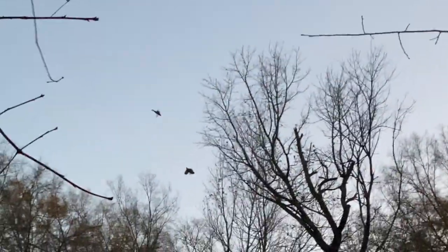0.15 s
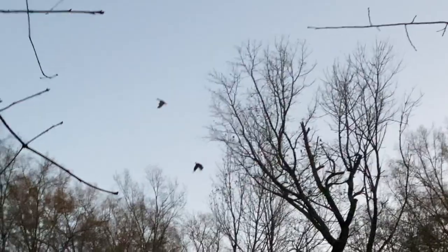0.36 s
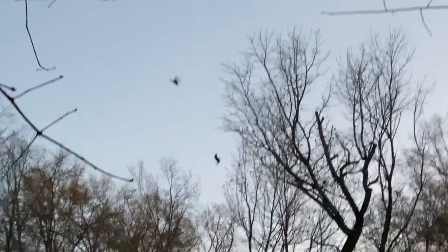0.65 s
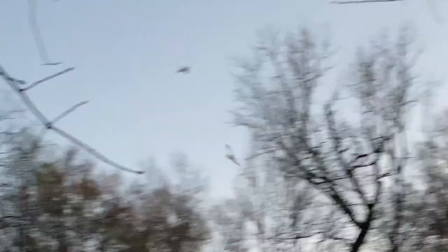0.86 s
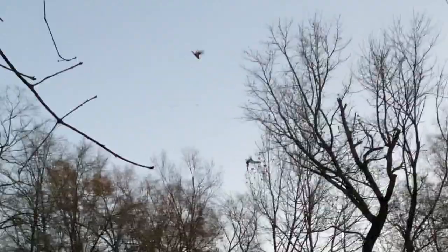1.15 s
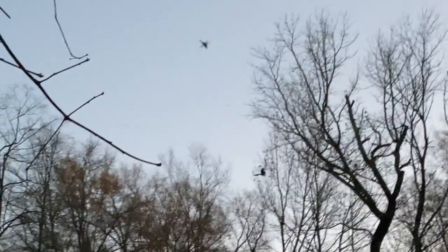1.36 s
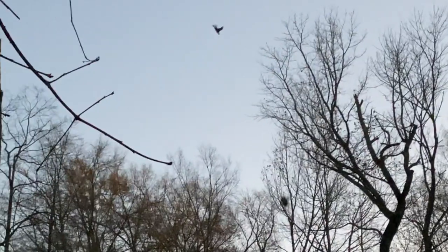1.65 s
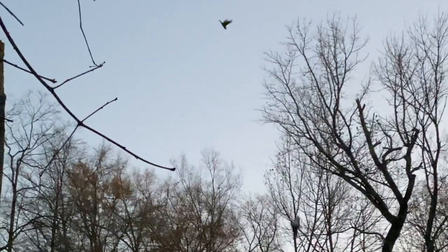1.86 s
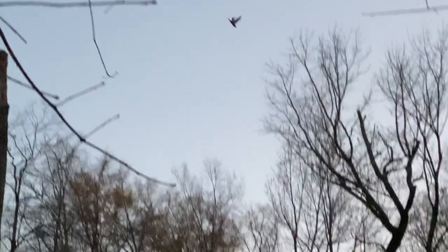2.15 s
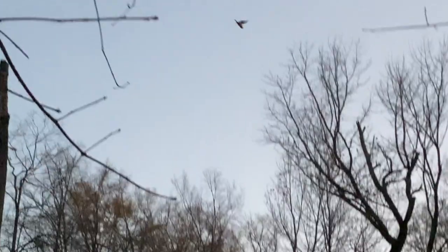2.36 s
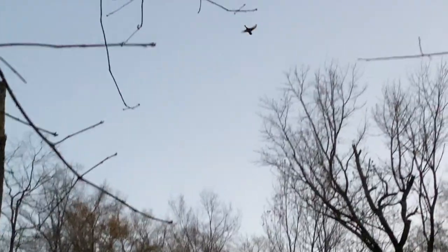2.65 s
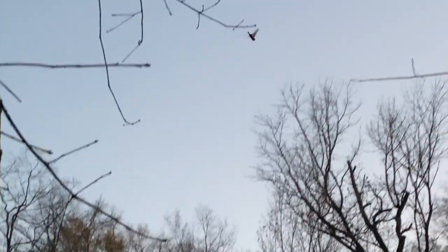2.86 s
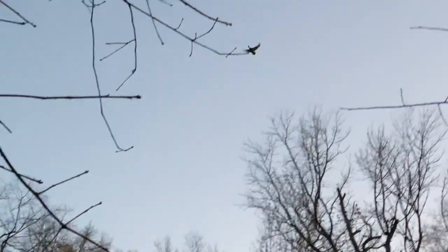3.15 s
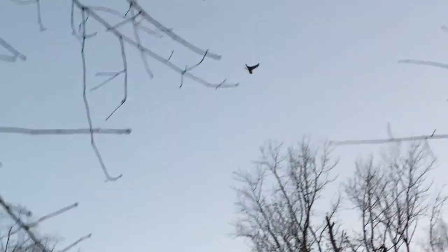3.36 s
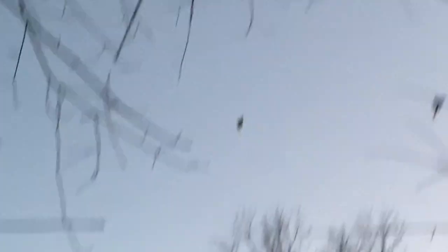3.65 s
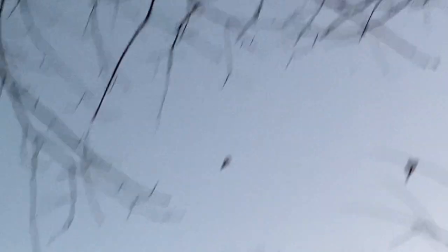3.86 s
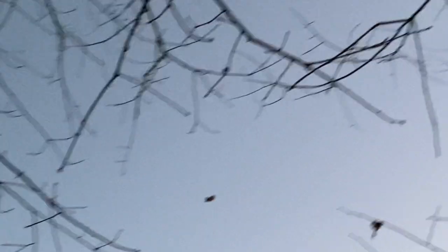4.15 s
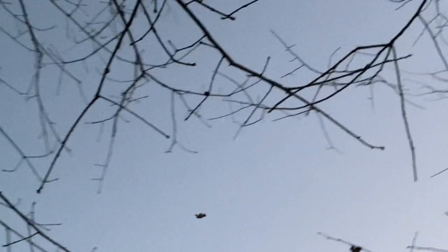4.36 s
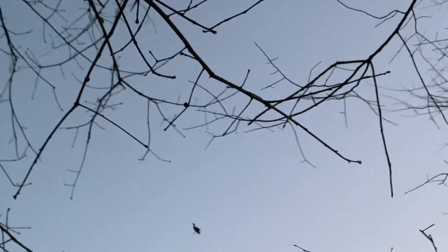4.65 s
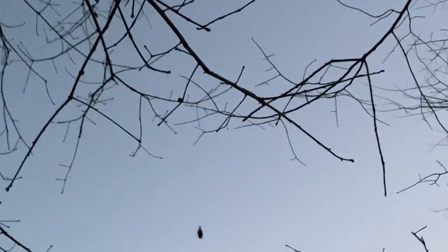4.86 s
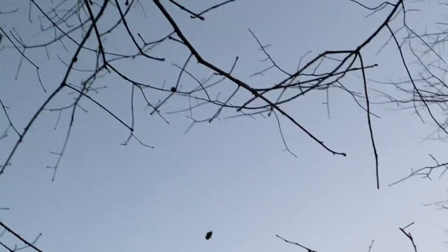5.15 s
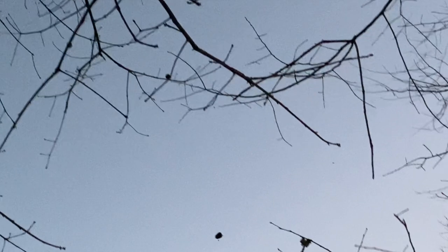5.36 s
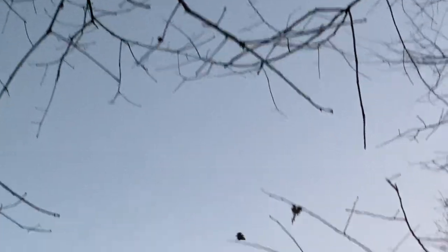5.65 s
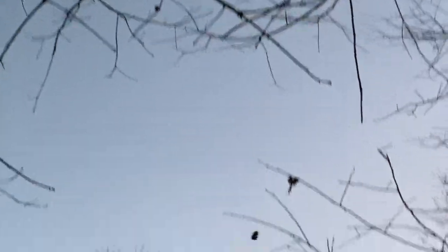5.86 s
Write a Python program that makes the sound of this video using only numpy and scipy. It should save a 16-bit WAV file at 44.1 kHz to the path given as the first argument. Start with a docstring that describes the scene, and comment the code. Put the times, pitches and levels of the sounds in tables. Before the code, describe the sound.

At about 0.1 seconds a shotgun fires in a flooded wood, with a ringing crack and a low boom. Echoes slap back near 0.3 and 0.7 seconds, then a swell from the far tree line rolls away, growing duller as it fades into faint air noise. At 2.9 seconds a weaker, more distant shot sounds, followed at 3.1 by a loud, deeper one, with thudding echoes until about 3.7. A soft low rumble rises around 4 seconds. Two more sharp blasts land at 4.6 and 4.85 seconds, the last the fullest, with a bright slap just behind it. Their echoes clatter off near trunks and roll through the wood, still fading at 6 seconds, over a few faint low throbs. The sound is wide stereo, as from a phone microphone that overloads slightly and ducks on the loudest peaks.

```python
"""A flooded wood, where guns at different distances fire five shotgun blasts at birds.
Each is a crack, a ringing shock and a low boom that sweeps down as the microphone's filtering delays
the lows. Scattering adds a clatter off near trunks and a swell from the far tree line, which rolls away
as the air absorbs its treble; a bank and stands of trees return echoes. Air noise and a rumble lie
beneath. A phone's processing widens the stereo, and its two microphone ports overload on the peaks."""
import sys
import numpy as np
from scipy import signal
from scipy.fft import rfft, irfft, next_fast_len
from scipy.io import wavfile

SR = 44100
rng = np.random.default_rng(int(sys.argv[2]) if len(sys.argv) > 2 else 0)


def output_pcm(signal):
    """Save a mono or channel-first signal as 16-bit PCM at the path in sys.argv[1].

    Samples are clipped to [-1, 1] before scaling.
    """
    pcm = np.clip(np.atleast_2d(signal).T, -1, 1) * 32767
    wavfile.write(sys.argv[1], SR, np.round(pcm).astype(np.int16))


N = 264908
STEP, CUTOFF_HZ = 16, 8900      # samples per envelope point; upper band edge
TIME = np.arange(N) / SR
SLOW_TIME = TIME[::STEP]
SIZE = next_fast_len(N + 4096, real=True)
FREQ = np.maximum(np.arange(SIZE // 2 + 1) * SR / SIZE, 1)

# The guns. Each row: start in seconds, shock level in dB, bark pitch in Hz, crack level in dB, crack
# tilt in dB per octave, boom level in dB, then boom length, crack decay and rebound delay in seconds.
SHOTS = [(0.0917, -2.5, 1220, -21, 2.5, -2.5, 0.027, 0.0095, 0.029),
         (2.917, -16.5, 814, -16.5, 0.5, -7.5, .019, 0.011, 0.016),
         (3.1242, 2, 636, -11, -3.5, -4, .031, 0.0072, .0165),
         (4.6079, -2.5, 1233, -7, 3, -1, 0.019, 0.0057, 0.011),
         (4.854, 0.5, 1452, -3.5, 1.5, 2.5, 0.036, 0.019, 0.018)]
# The wood's answer to each shot. Each row: near-trunk level in dB, its decay in seconds, deep-wood
# level in dB, tree-line level in dB, its delay in seconds, bank level in dB, gain of the stands in dB,
# their highest cutoff in Hz.
ANSWERS = [(-13, 0.06, -31, -17.5, 0.94, -15.5, 0.5, 12000),
           (-27, 0.028, -24.5, -21, 0.91, -35.5, -7, 1000), (-14, .086, -30.5, -32, 0.38, -15.5, -5.5, 800),
           (-15, 0.036, -22, -24, 0.67, -25, -10.5, 1200),
           (-11.5, 0.091, -20.5, -26, .64, -10.5, -9.5, 500)]
# Stands of trees that answer every shot. Each row: delay in seconds, level in dB, cutoff in Hz.
STANDS = [(0.224, -23.5, 498), (0.378, -24.5, 600), (0.465, -26, 515), (0.575, -33, 9900),
          (.644, -28.5, 1890)]
# Prominent slap echoes. Each row: start in seconds, thud level in dB, bark level in dB, bark pitch
# in Hz, noise level in dB.
SLAPS = [(0.2884, -17.5, -7, 420, -26), (.668, -15.5, -25.5, 500, -34), (3.032, -10.5, -28, 390, -32),
         (3.181, -19.5, -26, 704, -15.5), (3.33, -16.5, -18, 351, -23), (3.595, -25.5, -19.5, 956, -21.5),
         (3.641, -16.5, -31, 495, -41), (4.983, -24.5, -25, 1100, -9.5)]
# Spectra of crack, near trunks, far wood and quiet air. Each row: frequency in Hz, density in dB.
CRACK_SPECTRUM = [(30, -14.5), (120, -10), (300, 5), (650, 2.5), (950, -7), (1250, -6.5), (1900, -14.5),
                  (3300, -16.5), (5000, -23.5), (8500, -32)]
NEAR_SPECTRUM = [(30, -7), (120, 3.5), (300, -5), (650, -1.5), (1250, -7.5), (1900, -15.5), (3300, -17.5),
                 (5000, -21), (8500, -25)]
FAR_SPECTRUM = [(25, -21.5), (50, -7.5), (90, 3.5), (140, 3), (230, -4), (400, -4), (750, -5.5),
                (1250, -11), (1900, -14.5), (3500, -22.5), (5000, -27.5), (8500, -31.5)]
AIR_SPECTRUM = [(15, -39), (25, -12.5), (80, -6.5), (124, 2), (286, -10.5), (425, -8.5), (1220, -26.5),
                (2050, -45.5), (5500, -53.5), (9000, -73.5), (11700, -94), (19800, -120)]
# Absorption in the wood. Each row: frequency in Hz, loss in dB per second.
ABSORPTION = [(40, 6), (130, 7.5), (420, 12), (1100, 15), (2500, 27), (5000, 42), (9000, 65)]
# The rumble's envelope. Each row: time in seconds, level in dB.
RUMBLE_LEVELS = [(0, -62), (.8, -48.5), (2.0, -62), (3.3, -54), (4.05, -38), (4.35, -49), (4.8, -41.5),
                 (6, -48)]
# Resonances of the shock; peaks and dips of the housing. Each row: centre and width in Hz, gain in dB.
SHOCK_MODES = [(760, 92, 3), (1247, 290, 0), (2500, 190, -7.5), (3250, 500, -7.5), (4230, 170, -13.5)]
HOUSING_MODES = [(386, 110, 2), (583, 170, 2), (826, 120, 1.5), (960, 240, -1.5), (1145, 100, 1.5),
                 (1635, 200, 2), (2580, 1200, -0.5), (3266, 520, 5), (4130, 1400, 3), (5240, 990, -3.5),
                 (8050, 1500, -4)]
# Left-right likeness of scattered sound. Each row: frequency in Hz, coherence from 0 to 1.
COHERENCE = [(60, 1), (170, 0.55), (340, 0.17), (500, 0.14), (780, 0.76), (1200, 0.57), (1700, 0.03),
             (2200, 0.6), (3400, 0), (4300, 0.5), (5200, 1)]
# Balance of the channels. Each row: frequency in Hz, left minus right in dB.
CHANNEL_BALANCE = [(100, -0.1), (250, -0.5), (420, -2.5), (600, 2), (850, -3), (1300, -1), (1900, 5.5),
                   (2600, 6), (3300, -1.5), (4100, -5), (4900, 0.5), (9000, 0.5)]


def from_db(db):
    """Amplitude grows tenfold for every 20 dB."""
    return 10 ** (np.asarray(db) / 20)


def at_hz(points, hz):
    """Interpolation on a logarithmic frequency axis."""
    freqs, values = np.transpose(points)
    return np.interp(np.log(hz), np.log(freqs), values)


def density(spectrum, hz):
    """Spectral density as a gain at hz, normalised to unit power in the passband."""
    grid = FREQ[::STEP]
    power = np.mean(from_db(at_hz(spectrum, grid)) ** 2 * (grid < CUTOFF_HZ))
    return from_db(at_hz(spectrum, hz)) / np.sqrt(power)


def drift(rate_hz):
    """Low-passed noise gives a random fluctuation of unit variance."""
    pole = np.exp(-2 * np.pi * rate_hz * STEP / SR)
    noise = rng.standard_normal(2 * len(SLOW_TIME))
    slow = signal.lfilter([1], [1, -2 * pole, pole * pole], noise)[len(SLOW_TIME):]
    return slow / slow.std()


def burst(start, rise_s, fade_s):
    """An envelope of exponential build-up and decay."""
    age = np.maximum(SLOW_TIME - start, 0)
    return (1 - np.exp(-age / rise_s)) * np.exp(-age / fade_s)


def stereo_widening(from_hz, cycles, mid_lag_s=.0008, treble_lag_s=-.000374):
    """Phase shift: the phone's processing makes the right channel's middle range late, treble early."""
    split_hz = cycles / (mid_lag_s - treble_lag_s)      # the two lags join whole cycles apart
    lag_s = np.where(FREQ < split_hz, mid_lag_s * (FREQ > from_hz), treble_lag_s)
    return np.exp(-2j * np.pi * FREQ * lag_s)


def air_power(hz, level_db=-47):
    """Stationary noise: the quiet wood holds a constant power in each band."""
    return (from_db(level_db) * density(AIR_SPECTRUM, hz)) ** 2


def rumble(band_hz=(22, 55), apart=0.38, throb_start_s=5.05, every_s=.32, width_s=.055):
    """Amplitude modulation: very low noise swells slowly, then throbs three times, ever weaker."""
    bandpass = signal.butter(2, band_hz, "band", fs=SR, output="sos")
    mid, side = signal.sosfilt(bandpass, rng.standard_normal((2, N)))
    swell = from_db(np.interp(TIME, *np.transpose(RUMBLE_LEVELS)))
    throbs = sum(from_db(-25.5 - 5.5 * k) * np.exp(-((TIME - throb_start_s - k * every_s) / width_s) ** 2)
                 for k in range(3))
    return (swell + throbs) * (mid + apart * side * [[1], [-1]]) / mid.std()


def far_wood_power(hz, lag_s):
    """Reverberation from deep wood and tree line: absorption grows with path length and frequency."""
    loss_db_per_s = at_hz(ABSORPTION, hz)
    power = 0
    for (start, *_), (_, _, wood_db, line_db, delay_s, *_) in zip(SHOTS, ANSWERS):
        age = np.maximum(SLOW_TIME - start, 0)
        # the tree line swells as more of it is reached, then thins with distance
        reach = (age / delay_s) ** 1.77
        swell = reach / np.sqrt(1 + reach ** 2) / np.maximum(age / delay_s, 1) ** 0.71
        line = from_db(line_db - loss_db_per_s * np.maximum(age - .25, 0)) * swell
        wood = from_db(wood_db - loss_db_per_s * age) * burst(start + lag_s, rise_s=0.038, fade_s=0.9)
        power += line ** 2 + wood ** 2
    return density(FAR_SPECTRUM, hz) ** 2 * power


def echo_power(hz, bank_delay_s=.049, smear=0.29):
    """Reflection gives slaps and echoes off bank and stands; a farther stand smears its echo more."""
    # Each row: start in seconds, level in dB, decay in seconds, cutoff in Hz.
    echoes = [(start, db, 0.018, 1910) for start, *_, db in SLAPS]
    for (start, *_), (*_, bank_db, stands_db, top_hz) in zip(SHOTS, ANSWERS):
        echoes.append((start + bank_delay_s, bank_db, 0.02, 5060))
        echoes += [(start + delay_s, stands_db + db, smear * delay_s, min(dull_hz, top_hz))
                   for delay_s, db, dull_hz in STANDS]
    near = density(NEAR_SPECTRUM, hz)
    return sum((near * from_db(db) * burst(start, 0.00045, fade_s)) ** 2 / (1 + (hz / dull_hz) ** 4)
               for start, db, fade_s, dull_hz in echoes)


def clatter_power(hz, lag_s, rise_s=0.011):
    """Early scattering: the near trunks return each shot as a short clatter."""
    near = density(NEAR_SPECTRUM, hz)
    return sum((near * from_db(db) * burst(start + lag_s, rise_s, fade_s)) ** 2
               for (start, *_), (db, fade_s, *_) in zip(SHOTS, ANSWERS))


def crack_power(hz, lag_s, rise_s=.002):
    """A brief transient is broadband: each crack is a noise burst with its own spectral tilt."""
    crack = density(CRACK_SPECTRUM, hz)
    octaves = np.log2(hz / 1000)
    return sum((crack * from_db(db + tilt * octaves) * burst(start + lag_s, rise_s, fade_s)) ** 2
               for start, _, _, db, tilt, _, _, fade_s, _ in SHOTS)


def diffuse_field(grain_db=0.57, patchy_db=0.9, roll_db=1.0):
    """Incoherent sounds add in power; single trunks make the noise grainy, clumps make it roll."""
    left, other = rfft(rng.standard_normal((2, SIZE)))
    alike = np.clip(at_hz(COHERENCE, FREQ), 0, 1)
    right = alike * left * stereo_widening(from_hz=290, cycles=2) + np.sqrt(1 - alike ** 2) * other
    shared_db = grain_db * drift(280) + roll_db * drift(13)
    field = 0
    for hz in 25 * 2 ** (np.arange(19) / 2):      # half-octave bands
        window = np.cos(np.pi / 2 * np.minimum(2 * np.abs(np.log2(FREQ / hz)), 1))
        band = irfft([left * window, right * window], SIZE)[:, :N]
        lag_s = 0.71 / hz      # low bands start later
        power = far_wood_power(hz, lag_s) + echo_power(hz)
        power += clatter_power(hz, lag_s) + crack_power(hz, lag_s)
        grainy = hz / (hz + 300)      # long waves pass the trunks by
        flicker = from_db(grainy * shared_db + patchy_db * drift(12))
        field += band * np.interp(TIME, SLOW_TIME, np.sqrt(power * flicker ** 2 + air_power(hz)))
    return field


def boom(start, length_s, cycles, crest_s, rise_s):
    """Group delay: the microphone's high-pass filtering delays the lows, so the boom sweeps down."""
    age = np.clip(TIME - start, 1e-6, 1)
    envelope = (1 - np.exp(-age / rise_s)) * np.exp(-(age / length_s) ** 2)
    return envelope * np.cos(2 * np.pi * cycles * np.log(age / crest_s))


def shock(start, bark_hz, modes=(), bark_width_hz=85, rise_s=0.0028):
    """Damped resonance: the shock front, softened by twigs, rings with the gun's bark and any modes."""
    age = np.arange(SR // 10) / SR
    ring = sum(from_db(db) * np.exp(-np.pi * width * age) * np.sin(2 * np.pi * hz * age)
               for hz, width, db in [*modes, (bark_hz, bark_width_hz, 0)])
    return np.pad(ring * (1 - np.exp(-age / rise_s)), (int(start * SR), N))[:N]


def trunk_thuds(count=4, from_s=.39, until_s=.74, spread_db=5.5):
    """Backscatter from big trunks at random delays, in rows like the first four columns of SLAPS."""
    rows = []
    for (start, *_), (*_, stands_db, _) in zip(SHOTS, ANSWERS):
        for k, (jitter, strength, pitch) in enumerate(rng.uniform(-0.89, 1, (count, 3))):
            delay_s = from_s + (until_s - from_s) * (k + .5 + jitter / 2) / count
            db = stands_db + spread_db * strength
            rows.append((start + delay_s, db - 20.5, db - 23, 400 * 2 ** (pitch / 2)))
    return rows


def reflected_blasts(dull_hz=1600):
    """Discrete reflection: banks and big trunks return shock and boom weaker and duller."""
    wave = 0
    for start, thud_db, bark_db, bark_hz, *_ in SLAPS + trunk_thuds():
        wave += from_db(bark_db) * shock(start, bark_hz)
        wave += from_db(thud_db) * boom(start, length_s=.021, cycles=1.7, crest_s=0.0168, rise_s=0.0038)
    return signal.sosfilt(signal.butter(2, dull_hz, fs=SR, output="sos"), wave)


def direct_blasts(lag_s=.0018, usual_length_s=.026, rebound_db=-5.5):
    """Superposition on the direct path: each gun sends a shock, a boom and the shock's rebound."""
    wave = 0
    for start, shock_db, bark_hz, _, _, boom_db, length_s, _, rebound_s in SHOTS:
        onset = start + lag_s      # the blast follows just behind the first crackle
        crest_s = .0192 * np.cbrt(length_s / usual_length_s)      # a longer boom crests later
        wave += from_db(shock_db) * shock(onset, bark_hz, SHOCK_MODES)
        wave += from_db(boom_db) * boom(onset, length_s, cycles=1.3, crest_s=crest_s, rise_s=0.0059)
        wave += from_db(shock_db + rebound_db) * shock(start + rebound_s, bark_hz=1222)
    return wave


def housing_response():
    """A minimum-phase filter for each channel: the housing rings only after it is struck."""
    housing_db = sum(db / (1 + (2 * (FREQ - hz) / width) ** 4) for hz, width, db in HOUSING_MODES)
    balance_db = at_hz(CHANNEL_BALANCE, FREQ) * np.array([[1], [-1]]) / 2
    cepstrum = irfft(np.log(from_db(housing_db + balance_db)), SIZE)
    return np.exp(rfft(cepstrum * (1 + np.sign(np.fft.fftfreq(SIZE))), SIZE))


def limiter(x, threshold_db=-9, release_db_per_s=25, attack_s=0.045, share=0.44):
    """Compression: peaks pull the gain down and it creeps back, so the echo sinks and recovers."""
    over_db = np.maximum(20 * np.log10(np.abs(x).max(axis=0) + 1e-9) - threshold_db, 0)
    held_db = np.maximum.accumulate(over_db + release_db_per_s * TIME) - release_db_per_s * TIME
    pole = np.exp(-1 / (attack_s * SR))
    return x * from_db(-share * signal.lfilter([1 - pole], [1, -pole], held_db))


def scene():
    """Superposition: guns, wood and rumble add linearly in stereo, coloured by the housing."""
    blasts = rfft(reflected_blasts() + direct_blasts(), SIZE)
    widened = irfft([blasts, blasts * stereo_widening(from_hz=0, cycles=3)], SIZE)[:, :N]
    mix = widened + diffuse_field() + rumble()
    return irfft(rfft(mix, SIZE) * housing_response(), SIZE)[:, :N]


def record(dry, ceiling=0.83):
    """Overload: the gain ducks, saturation rounds the peaks and a low-pass cuts the top."""
    lowpass = signal.ellip(10, .2, 80, CUTOFF_HZ, fs=SR, output="sos")
    return signal.sosfilt(lowpass, ceiling * np.tanh(limiter(dry) / ceiling))


dry = scene()
out = record(dry)
output_pcm(out)
```